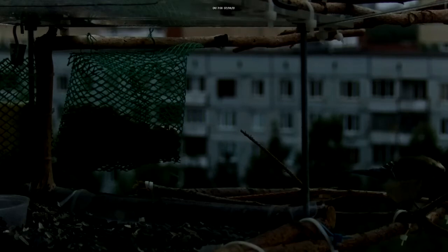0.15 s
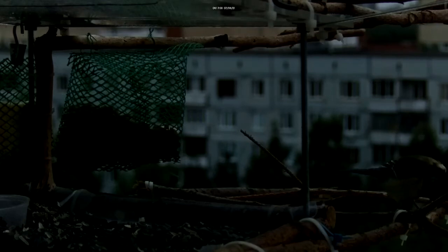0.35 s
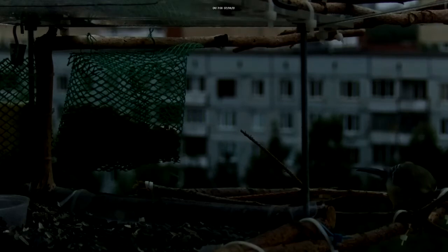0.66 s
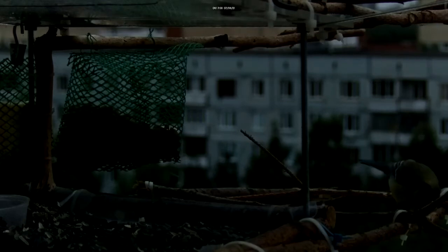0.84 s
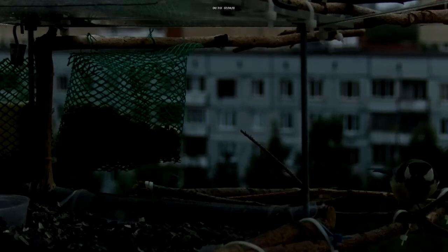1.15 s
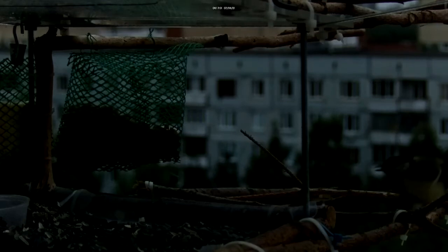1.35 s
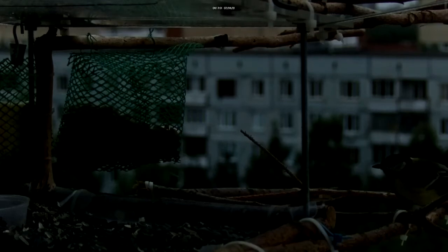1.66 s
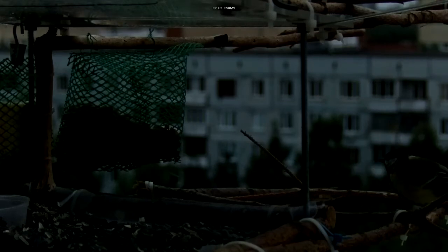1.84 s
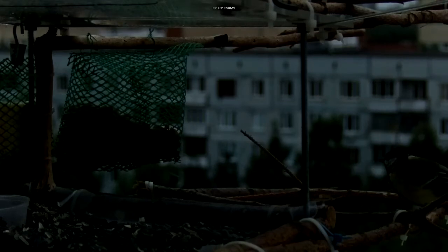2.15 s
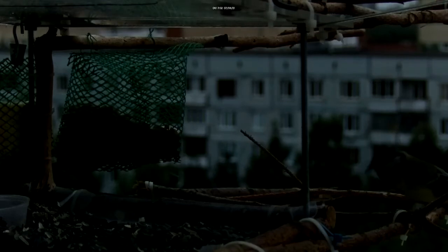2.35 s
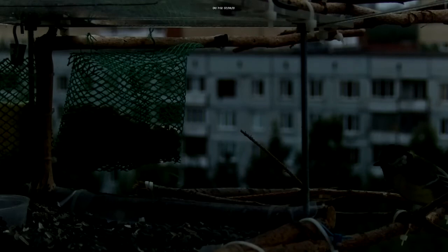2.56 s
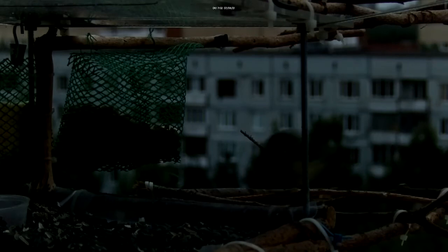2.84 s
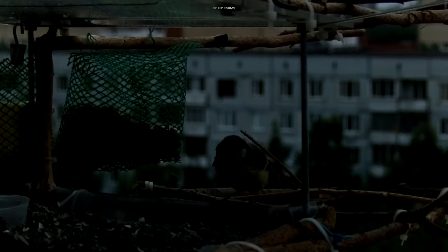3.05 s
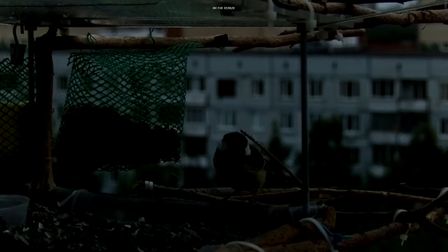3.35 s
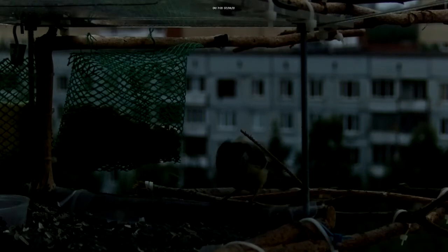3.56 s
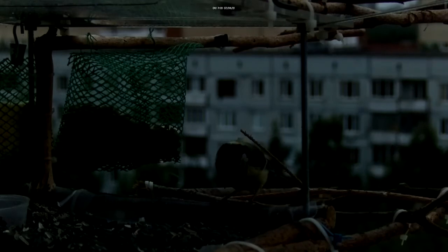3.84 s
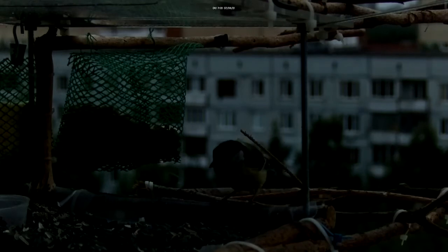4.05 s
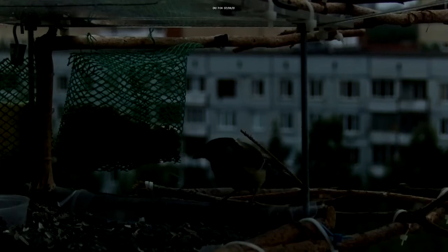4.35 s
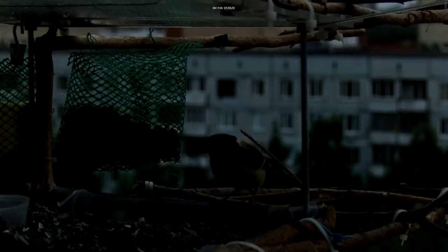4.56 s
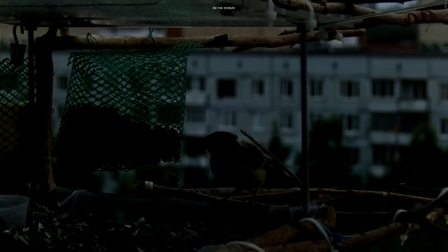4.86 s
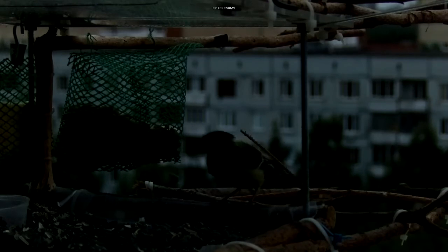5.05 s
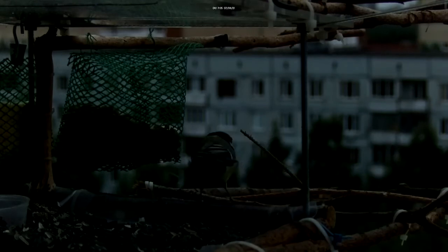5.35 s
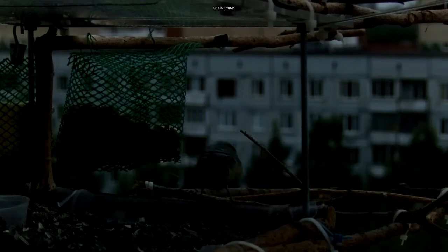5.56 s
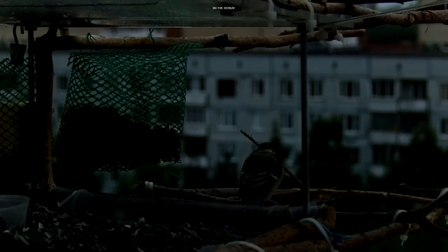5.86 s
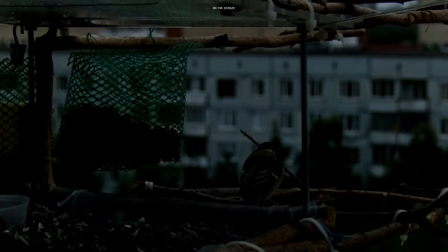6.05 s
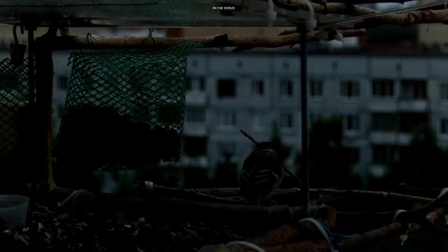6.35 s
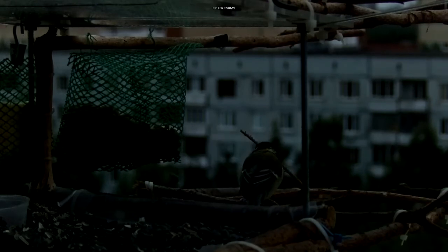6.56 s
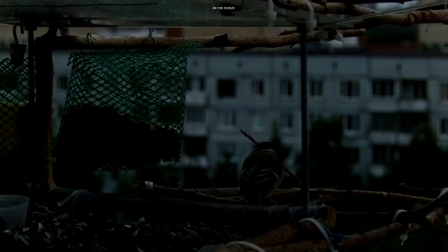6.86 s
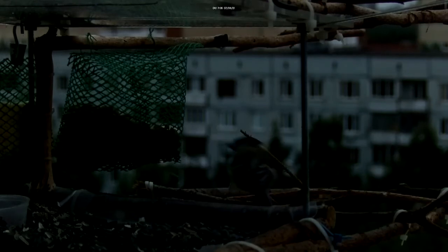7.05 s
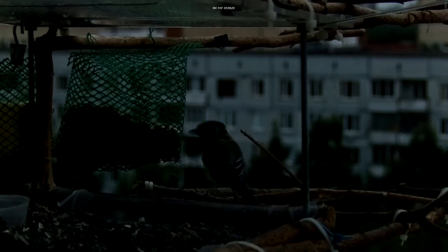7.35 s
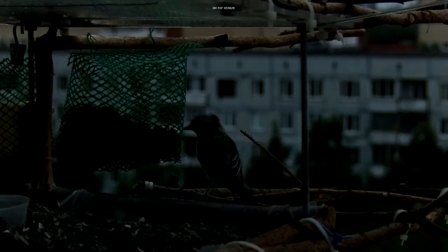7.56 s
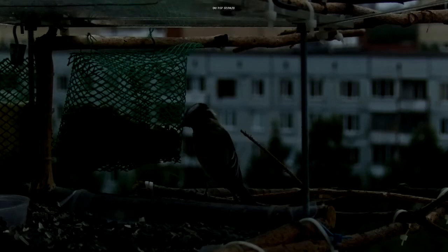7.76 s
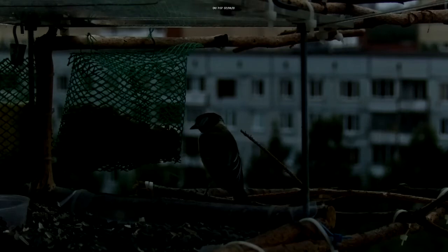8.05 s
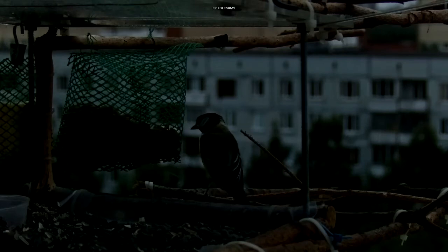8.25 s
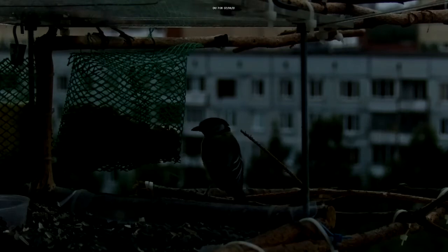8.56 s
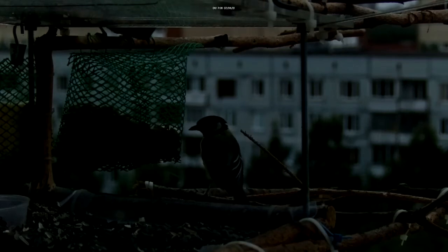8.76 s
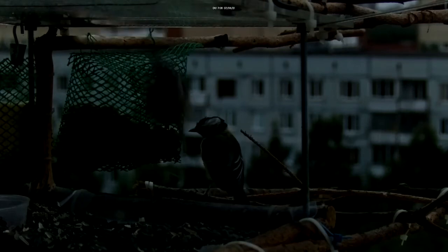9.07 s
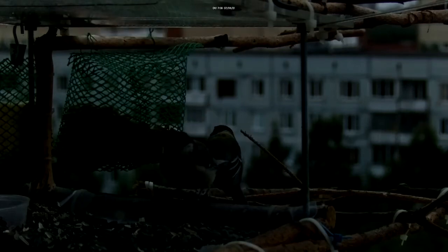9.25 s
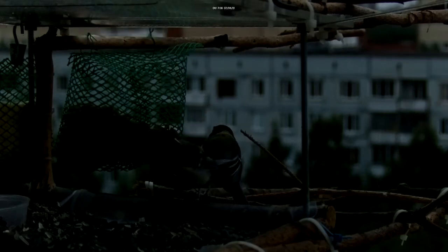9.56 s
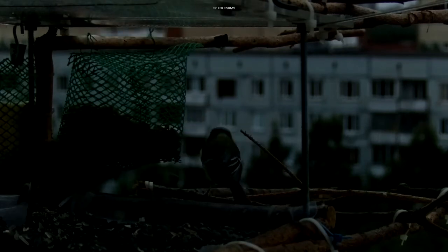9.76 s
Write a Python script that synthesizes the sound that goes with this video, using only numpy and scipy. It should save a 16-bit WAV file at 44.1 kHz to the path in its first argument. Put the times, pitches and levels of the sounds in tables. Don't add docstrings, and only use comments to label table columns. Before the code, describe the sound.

Small birds hop and peck at a wooden feeder, sharp taps, husk cracks and scratchy rustles over steady hiss, with brief chirps and a hoarse scold.

```python
import sys
import numpy as np
from scipy import signal
from scipy.fft import rfft, irfft, next_fast_len
from scipy.io import wavfile
from scipy.ndimage import uniform_filter1d

SR = 44100
rng = np.random.default_rng(int(sys.argv[2]) if len(sys.argv) > 2 else 0)


def gain_from_db(level_db):
    decades = np.asarray(level_db, float) / 20
    return 10 ** decades


def inscribe(sig):
    pcm = np.round(np.clip(np.atleast_2d(sig).T, -1, 1) * 32767)
    wavfile.write(sys.argv[1], SR, pcm.astype(np.int16))


N = 437031
t = np.arange(N) / SR

# f/Hz, level/dB
RUMBLE_EQ = [(15, -71), (25, -53), (119, -29.5), (202, -21), (238, -13.5), (413, -9.5), (630, -9),
             (785, -0.5), (1050, -1), (1460, -6), (2000, -20.5), (2600, -28), (4400, -120)]
# f/Hz, level/dB
YARD_EQ = [(2250, -4), (2700, -1.5), (3200, 0.5), (3700, 5.5), (4200, 3), (5200, 4), (6800, 0), (9000, -7)]
# f/Hz, level/dB
CIRCUIT_EQ = [(6000, -21.5), (9000, -10), (12000, -9.5), (15000, -9.5), (15800, -11.5)]
# t/s, level/dB
GAIN = [(0, -67.5), (1.1, -68.5), (1.78, -67), (1.99, -60), (2.005, -72), (2.04, -63.5), (2.15, -56),
        (2.45, -56.5), (2.75, -53.5), (4.3, -53), (9.91, -53.5)]
YARD_DB, CIRCUIT_DB, CIRCUIT_LAG_S = -4.5, -7.5, 0.098

# f/Hz, level/dB
FEATHERS_EQ = [(1350, -48), (2300, -7.5), (3550, -5.5), (3960, -2), (5110, -0.5), (7080, -3.5),
               (9000, -10.5), (11700, -58), (19800, -120)]
# t/s, length/s,
# level/dB
SHUFFLES = [(2.044, 0.016, -44), (2.111, 0.082, -49.5), (2.202, 0.035, -47), (2.231, 0.042, -45.5),
            (2.293, 0.057, -46), (2.331, 0.039, -55), (2.357, 0.035, -42.5), (2.631, 0.028, -52),
            (2.648, 0.035, -48), (2.665, 0.015, -34), (2.694, 0.02, -47), (2.8, 0.05, -50),
            (3.792, 0.022, -59), (4.206, 0.024, -52), (4.58, 0.15, -54.5), (4.645, 0.014, -56),
            (4.85, 0.045, -51), (4.88, 0.032, -43.5), (5.28, 0.027, -52.5), (5.98, 0.054, -56),
            (6.34, 0.027, -55), (7.455, 0.026, -46), (7.532, 0.059, -47.5), (7.987, 0.012, -42),
            (8.148, 0.015, -46), (8.731, 0.02, -49), (9.155, 0.012, -45.5)]
# t/s, length/s, level/dB
BRUSHES = [(.295, 0.047, -68.5), (.351, 0.072, -63.5), (1.296, 0.023, -67), (1.33, 0.062, -67),
           (1.776, 0.05, -61), (1.912, 0.022, -56), (3.832, .016, -40), (3.839, 0.089, -49.5),
           (4.088, 0.17, -53.5), (4.12, 0.0093, -54), (4.131, 0.014, -41), (4.749, 0.025, -49),
           (6.045, 0.088, -60), (6.878, .051, -55.5), (7.443, 0.014, -45), (7.731, 0.047, -48),
           (8.033, 0.019, -51), (8.07, 0.017, -42), (8.68, 0.048, -45), (8.697, 0.015, -45.5),
           (1.955, 0.025, -67)]
# t/s, length/s, level/dB
CRUMBS = [
    (9.127, 0.027, -47),
    (9.509, 0.009, -41.5),
    (9.72, 0.027, -48),
    (9.744, 0.0095, -44.5),
]
# t/s, length/s, level/dB
SCRAPES = [(1.792, 0.0075, -60.5), (2.68, 0.021, -36.5), (7.52, 0.011, -41), (8.688, 0.019, -48),
           (4.141, 0.028, -34.5), (4.181, 0.0043, -50), (4.19, 0.015, -49), (4.212, 0.0037, -48),
           (7.978, .009, -44), (8.047, 0.027, -33), (8.7965, 0.006, -30.5), (8.808, .006, -37)]
# events, centre f/Hz, treble level/dB, share of length spent fading/1
RUSTLE_TYPES = [
    (SHUFFLES, 5150, -21, 0.68),
    (BRUSHES, 5860, -15, 0.46),
    (CRUMBS, 5450, -1.2, 0.68),
    (SCRAPES, 5800, -11.5, 0.2),
]

# t/s, peak level/dB, ring f/Hz, scattered tail level/dB
KNOCKS = [(1.3159, -41.5, 6900, -18), (2.137, -33, 6500, -15), (2.2214, -26, 5200, -11),
          (2.2585, -28.5, 5200, -10), (2.3153, -22.5, 5260, -21), (2.3647, -20, 5960, -26),
          (2.37, -22, 6130, -28), (2.3843, -22.5, 6030, -12), (2.6658, -11, 5500, -14),
          (2.6757, -23, 4800, -6), (2.682, -19.5, 5340, -5.5), (3.8806, -25, 6040, -32),
          (3.9025, -34, 6500, -3), (4.2222, -28, 4400, -17), (4.559, -32.5, 5600, 0),
          (4.655, -35, 5600, -3), (4.7532, -16, 5700, -13.5), (6.0419, -24.5, 5470, -5.5),
          (6.0596, -35, 5540, -24), (6.8796, -40, 4010, -4), (8.001, -24, 7000, -5.5),
          (8.1395, -16.5, 3380, 1), (8.142, -21, 6500, -7), (7.469, -44, 6000, -13),
          (7.572, -48, 5500, -13), (8.71, -24, 5850, -1), (8.734, -29, 6000, 3.5)]
# t/s, peak level/dB, ring f/Hz, scattered tail level/dB
PECKS = [(1.3354, -41, 5300, -26), (1.3614, -36, 5960, -36), (1.7661, -49, 4010, -2),
         (1.8311, -34.5, 8300, -3), (1.916, -38.5, 3720, -11), (1.9933, -4, 5900, -15.5),
         (2.0364, -57, 5500, -16), (2.0473, -44, 4500, -10), (2.0933, -41, 3230, 1),
         (2.6903, -29, 5540, -5), (2.7154, -38, 5810, -12), (3.8109, -35, 6300, -20),
         (3.8878, -29, 6000, -13), (4.0832, -33, 6030, -19), (4.204, -20, 4400, -5),
         (4.7713, -33, 5470, 2.5), (4.8837, -34, 5990, -20), (6.0955, -35.5, 5600, -2.5),
         (7.5368, -40, 5100, 2), (7.556, -39, 7200, 2), (7.8124, -39, 5600, -2.5),
         (8.1378, -4.5, 5760, -14), (8.1619, -22, 4940, -29), (8.6781, -35, 5900, -15.5),
         (8.9633, -26, 7250, -11), (9.212, -33, 4630, -11), (9.64, -32, 7300, -6)]
# t/s, peak level/dB, ring f/Hz, scattered tail level/dB
CLAWS = [
    (4.1983, -22, 4650, -5),
    (7.4531, -38, 3740, 1),
    (8.716, -26, 4230, 2),
    (8.8335, -30, 9470, -4),
    (8.937, -28.5, 6600, 5),
    (9.136, -38, 4060, -9),
    (9.7577, -33, 6900, -21),
]
# t/s, peak level/dB, ring f/Hz, scattered tail level/dB
CRACKS = [
    (0.38, -42.5, 6100, 2),
    (0.4485, -44.5, 6300, -7),
    (7.748, -26.5, 5670, -12.5),
    (8.047, -23, 5550, -16),
    (9.5427, -34, 9900, -4.5),
    (9.5463, -21, 5850, -16),
    (9.5662, -18.5, 7160, -9),
    (9.5675, -34, 5600, -36),
    (9.8967, -29, 4800, -3.5),
]
# t/s, peak level/dB, ring f/Hz, scattered tail level/dB
SNAPS = [(4.2045, -33, 14500, -30), (4.528, -42, 8300, 6), (8.058, -24, 12600, -25),
         (8.7948, -36, 9000, -15), (8.7992, -8, 10600, -30), (8.8027, -9.5, 10900, -26),
         (8.8035, -15.5, 6040, -8), (9.2115, -37, 9600, -10), (9.5452, -16, 12600, -12),
         (9.8965, -24, 13000, -34), (9.9, -38, 12100, -12)]
# events, treble level/dB, tail T60/s, lowest twig mode level/dB, relative click width/1
TAP_TYPES = [
    (KNOCKS, -31, .022, -2, 0.23),
    (PECKS, -17, 0.021, -2.3, .29),
    (CLAWS, -10.5, 0.016, -12, .29),
    (CRACKS, 5.4, 0.013, -22, .25),
    (SNAPS, 0, 0.01, -27, 0.069),
]
# f/Hz, relative width/1, level/dB
TWIG = [(3500, 0.11, 9), (4400, 0.18, 10.5), (5600, 0.097, 1), (7140, 0.041, -23)]
FRAME_HZ = [3200, 4450, 5100, 5750, 6400, 7300]
FRAME_SCATTER_DB = 6.5
WALL_T60_S, WALL_DB = 0.097, -18.5

# t/s, peak level/dB, ring f/Hz, hollow boom above the ring/dB
THUMPS = [(0.383, -46.5, 1040, -10), (1.766, -46.5, 1110, -11), (1.917, -41, 1010, -11),
          (1.992, -40.5, 1190, -30), (2.145, -42.5, 1030, -26), (2.22, -44, 970, -21),
          (2.259, -38, 1110, -20), (2.304, -38, 1070, -29), (2.374, -33, 1110, -33),
          (2.666, -35.5, 1300, -18), (2.695, -32.5, 1250, -6.5), (3.838, -34.5, 1090, -15),
          (4.15, -40.5, 1300, -6.5), (4.202, -40, 1070, -6.5), (4.559, -31.5, 1280, -17.5),
          (4.761, -35, 1050, -12), (4.774, -38, 1060, -6.5), (6.039, -38.5, 1360, -18),
          (6.097, -40, 950, -6), (7.529, -44.5, 910, -7), (7.811, -41, 900, -27), (7.998, -40, 970, -9),
          (8.07, -41, 1310, -22), (8.136, -35, 1140, -6.5), (8.71, -37.5, 990, -4),
          (8.7945, -33.5, 1470, -17), (8.938, -37, 1200, -12)]
SEED_T60_S = 0.078

# t/s, length/s, start f/Hz, level/dB
CHIRPS = [(1.015, .022, 4100, -74), (4.448, .018, 4000, -60), (3.637, .019, 3950, -54),
          (3.722, .022, 4400, -48), (4.527, .02, 4100, -56), (5.0, .016, 3900, -55),
          (5.097, .027, 4250, -46), (5.214, .019, 4200, -43), (5.921, .022, 4100, -56),
          (6.159, .022, 4000, -50), (6.234, .028, 4280, -46), (6.425, .022, 4150, -50)]
# t/s, length/s, start f/Hz, level/dB
WHISTLES = [(1.986, 0.0068, 6400, -42), (2.125, 0.12, 550, -62), (2.27, 0.087, 560, -62),
            (2.36, 0.064, 552, -56), (2.792, 0.0044, 5760, -35), (2.844, 0.0046, 5740, -34),
            (2.8435, 0.0098, 4200, -43), (6.98, 0.22, 1570, -63), (7.078, 0.081, 4100, -61),
            (7.166, 0.067, 4020, -54), (7.23, .08, 4020, -67), (7.33, 0.08, 4010, -67),
            (7.4, 0.068, 4000, -55), (7.45, 0.25, 3930, -62), (7.55, 0.093, 3960, -58),
            (7.56, 0.19, 4140, -68), (7.77, 0.12, 4320, -57.5), (7.9, 0.091, 4360, -60),
            (8.355, 0.029, 2850, -60), (8.568, 0.015, 4100, -50)]
# t/s, length/s, start f/Hz, level/dB
WARBLES = [
    (4.792, .009, 4400, -46),
    (8.908, .016, 4170, -53),
    (6.64, .14, 6050, -65),
]
# t/s, length/s, start f/Hz, level/dB
TWITTER = [
    (7.484, 0.047, 5650, -56),
    (7.502, 0.013, 3500, -47),
    (8.416, 0.027, 3450, -56.5),
    (8.48, 0.036, 3500, -57),
    (8.552, 0.027, 3550, -56),
    (8.645, 0.028, 3750, -55),
    (9.0, 0.027, 3750, -57.5),
    (9.09, 0.042, 3900, -60),
]
# t/s, length/s, start f/Hz, level/dB
HUMS = [
    (6.22, 0.81, 367.6, -71),
    (6.25, 0.28, 298, -70),
    (6.85, 0.5, 301, -75),
]
# t/s, length/s, start f/Hz, level/dB
TRILL_DOWN = [
    (2.7985, 0.0071, 8730, -35.5),
    (2.8125, 0.0072, 7600, -32.5),
    (2.818, .005, 8400, -40),
    (2.8225, 0.0064, 7570, -28),
    (2.802, .007, 6100, -42),
    (2.818, .01, 6200, -44),
    (2.819, 0.014, 4900, -45),
    (2.823, 0.0086, 4260, -47),
]
# t/s, length/s, start f/Hz, level/dB
TRILL_UP = [
    (2.801, .014, 7500, -35),
    (2.832, 0.0048, 7100, -42),
    (2.838, 0.0079, 7000, -52),
    (2.798, .003, 6200, -40),
]
# events, end over start pitch/1, fall/(Hz/s), warble 0 to 1, softness of the ends/1
NOTE_TYPES = [
    (CHIRPS, 1, 62000, .3, .35),
    (WHISTLES, .997, 0, .35, .5),
    (WARBLES, .94, 0, .9, .2),
    (TWITTER, 1.05, 0, .8, .2),
    (HUMS, 1.005, 0, .05, .6),
    (TRILL_DOWN, .95, 0, .15, .4),
    (TRILL_UP, 1.11, 0, .15, .4),
]

# t/s, length/ms, level/dB, first
# mode f/Hz, second mode f/Hz
CREAKS = [(2.047, 16, -55, 4450, 6000), (2.092, 9, -55, 3200, 5600), (2.219, 8, -44, 5150, 4500),
          (2.257, 8, -44, 5100, 4500), (2.306, 20, -44, 5050, 3200), (2.343, 12, -49, 5200, 6000),
          (2.363, 14, -43, 6100, 4700), (2.674, 5, -36, 5800, 4500), (2.68, 8, -36, 5100, 6600),
          (2.689, 9, -41, 5100, 6000), (3.834, 12, -44, 4500, 6100), (3.862, 10, -53, 4500, 5900),
          (3.886, 10, -53, 3300, 6000), (4.145, 6, -40, 4500, 6300), (4.154, 8, -39, 4400, 6400),
          (4.163, 7, -46, 3200, 4700), (4.198, 4, -35, 4500, 5600), (4.2035, 4, -39, 4400, 3200),
          (4.212, 6, -48, 4400, 6300), (4.221, 5, -43, 4600, 3600), (4.858, 24, -49, 4700, 5900),
          (4.882, 12, -47, 5900, 7200), (4.902, 20, -44, 4600, 6100), (7.444, 8, -47, 4400, 5400),
          (7.45, 6, -48, 3400, 5200), (7.52, 4, -44, 6600, 4600), (7.524, 7, -43, 5700, 3700),
          (7.536, 6, -43, 4200, 5600), (7.979, 6, -43, 4280, 5750), (8.0005, 6, -42, 4300, 5500),
          (8.057, 9, -37, 5600, 6900), (8.065, 6, -39, 3500, 5400), (8.677, 4, -44, 5750, 7500),
          (8.708, 5, -40, 6300, 5700), (8.713, 6, -38, 4450, 3200), (8.726, 5, -37, 4700, 3200),
          (8.936, 5, -35, 7600, 5900), (9.5115, 5, -44, 4150, 8300), (9.5455, 3, -36, 5500, 8300),
          (9.566, 3.5, -34, 5400, 10400)]
CREAK_DB = 1

# t/s, length/s, level/dB, pitch f/Hz, beak resonance f/Hz
SCOLD = [
    (2.876, 0.058, -31.5, 521, 5950),
    (2.936, 0.062, -35, 515, 4960),
    (3.006, 0.057, -32.5, 516, 5370),
    (3.075, 0.053, -32.5, 565, 7800),
    (3.144, 0.059, -32.5, 490.7, 4540),
    (3.226, 0.066, -33, 565, 5160),
]
# f/Hz, level/dB
THROAT_EQ = [(1200, -22), (1740, -3), (2250, -10), (3200, -1), (3800, 1.5), (4550, -6), (5050, -14),
             (5600, -2.5), (6600, -8), (7900, -10), (8500, -4.5), (9700, -18.5), (11000, -21.5),
             (14000, -28)]
BEAK_DB, SCOLD_FADE_DB = -6, -6

# t/s, pitch f/Hz, level/dB
ENGINE = [
    (4.3, 195, -84),
    (4.8, 199.7, -76),
    (5.8, 210, -75.5),
    (6.8, 219, -80),
    (7.0, 223, -99),
]
ENGINE_PARTIALS_DB = [-6, -0.5]
# t/s, pitch f/Hz, level/dB
CRY = [
    (6.58, 1610, -70),
    (6.64, 1600, -60),
    (6.76, 1580, -59),
    (6.8, 1535, -63),
    (6.92, 1515, -64),
    (7.0, 1490, -63),
    (7.14, 1470, -71),
]
CRY_PARTIALS_DB = [-8, 0, -18, -14]

# f/Hz, level/dB
TYRES_EQ = [(1400, 6), (1800, -2), (3000, -3)]
CAR_S, CAR_SPAN_S, CAR_DB = 7.04, 0.22, -58


def unit(x):
    return x / np.sqrt(np.mean(x ** 2))


def peak(x):
    return x / np.abs(x).max()


def colour(x, points):
    hz, db = np.transpose(points)
    size = next_fast_len(len(x))
    octave = np.log2(np.arange(size // 2 + 1) * SR / size + 1)
    below = np.maximum(np.log2(hz[0]) - octave, 0)
    above = np.maximum(octave - np.log2(hz[-1]), 0)
    gain = gain_from_db(np.interp(octave, np.log2(hz), db) - 53 * (below + above))
    return unit(irfft(rfft(x, size) * gain, size)[:len(x)])


def walk(rate):
    hold = int(SR / rate)
    steps = np.repeat(rng.standard_normal(N // hold + 1), hold)
    return unit(uniform_filter1d(steps, hold)[:N])


def ring(x, hz, width):
    return signal.lfilter(*signal.iirpeak(hz, 1 / max(width, .02), fs=SR), x)


def frame(x, shares):
    return sum(gain_from_db(FRAME_SCATTER_DB * share) * ring(x, hz, 0.023) for hz, share in zip(FRAME_HZ, shares))


def add(out, s, sound):
    i = int(s * SR)
    out[i:i + len(sound)] += sound[:N - i]


def with_kind(types):
    return [row + tuple(kind) for table, *kind in types for row in table]


def ground():
    gain_db = np.interp(t, *np.transpose(GAIN))
    keep = np.exp(-1 / (CIRCUIT_LAG_S * SR))
    late_db = gain_db[0] + signal.lfilter([1 - keep], [1, -keep], gain_db - gain_db[0])
    circuit_db = np.minimum(gain_db, late_db) + CIRCUIT_DB
    layers = [(RUMBLE_EQ, gain_db, 1.05 * walk(9.9)),
              (YARD_EQ, gain_db + YARD_DB, 0.7 * walk(12)),
              (CIRCUIT_EQ, circuit_db, 0.41 * walk(19))]
    return sum(colour(rng.standard_normal(N), points) * gain_from_db(db + wander_db)
               for points, db, wander_db in layers)


def rustles():
    grains = rng.standard_normal(N) * gain_from_db(2.8 * walk(900) + 0.46 * walk(120))
    body = colour(grains, FEATHERS_EQ)
    treble = colour(grains, [(8500, -5.0), (10500, -9.0), (13000, -7.5), (15500, -10.0)])
    out = np.zeros(N)
    rows = with_kind(RUSTLE_TYPES)
    spots = rng.standard_normal((len(rows), len(FRAME_HZ)))
    for (s, length, db, hz, treble_db, fade), shares in zip(rows, spots):
        part = slice(int(s * SR), int((s + length) * SR))
        rub = ring(body[part], hz, 1.0) + 0.67 * frame(body[part], shares)
        sound = unit(rub) + gain_from_db(treble_db) * treble[part]
        add(out, s, gain_from_db(db) * sound * signal.windows.tukey(len(sound), min(fade, 1)))
    return out


def taps():
    out = np.zeros(N)
    fall = np.log(1000) * t[:SR // 8]
    blow = (fall == 0) * 1.
    edge = peak(ring(ring(blow, 9900, 0.86), 9900, 0.86))
    perch = peak(ring(blow, 3630, 0.12))
    rows = with_kind(TAP_TYPES)
    noises = rng.standard_normal((len(rows), len(fall)))
    spots = rng.standard_normal((len(rows), len(FRAME_HZ)))
    for row, noise, shares in zip(rows, noises, spots):
        s, db, hz, tail_db, treble_db, t60, perch_db, click_width = row
        click = peak(ring(ring(blow, hz, click_width), hz, 0.44))
        twig = sum(gain_from_db(mode_db) * ring(ring(noise, mode_hz, width), mode_hz, 2 * width)
                   for mode_hz, width, mode_db in TWIG)
        scatter = unit(twig) + 0.83 * unit(frame(noise, shares))
        scatter += 0.28 * unit(ring(ring(noise, hz, 0.2), hz, 0.76))
        scatter += gain_from_db(treble_db) * unit(ring(noise, 6200, 0.83))
        decay = np.exp(-fall / t60) + gain_from_db(WALL_DB) * np.exp(-fall / WALL_T60_S)
        tail = scatter * decay + gain_from_db(perch_db) * perch
        add(out, s, gain_from_db(db) * (click + gain_from_db(treble_db) * edge + gain_from_db(tail_db - 7.5) * tail))
    return out


def thumps():
    out, u = np.zeros(N), t[:SR // 6]
    noises = rng.standard_normal((len(THUMPS), len(u)))
    for (s, db, hz, boom_db), noise in zip(THUMPS, noises):
        blow = gain_from_db(-16.5) * noise * np.exp(-np.log(1000) * u / SEED_T60_S)
        blow[0] = 1
        board = ring(ring(blow, hz, 0.22), hz, 1.0)
        hollow = ring(ring(blow, 540, 0.26), 430, 0.87)
        add(out, s, gain_from_db(db) * (peak(board) + gain_from_db(boom_db + 3.5) * peak(hollow)))
    return out


def notes():
    out, warble = np.zeros(N), walk(700)
    for s, length, hz, db, glide, fall, rough, soft in with_kind(NOTE_TYPES):
        count = int(length * SR)
        pitch = np.linspace(hz, hz * glide - fall * length, count)
        tone = np.sin(2 * np.pi * np.cumsum(pitch) / SR)
        wobble = 1 - rough * 0.19 + rough * warble[int(s * SR):][:count]
        add(out, s, np.sqrt(2) * gain_from_db(db) * np.hanning(count) ** soft * wobble * tone)
    yard = rng.standard_normal(SR // 5) * np.exp(-t[:SR // 5] / 0.01)
    return out + gain_from_db(-11.0) * signal.fftconvolve(out, yard / np.linalg.norm(yard))[:N]


def creaks():
    out = np.zeros(N)
    noises = rng.standard_normal((len(CREAKS), SR // 20))
    for (s, ms, db, *pair), noise in zip(CREAKS, noises):
        count = int(ms * SR / 1000)
        push = noise * np.pad(np.sqrt(np.hanning(count)), (0, len(noise) - count))
        sound = sum(unit(ring(ring(push, hz, 0.08), hz, 0.2)) for hz in pair)
        add(out, s, gain_from_db(db + CREAK_DB) * unit(sound) * np.sqrt(count / len(noise)))
    return out


def scold():
    s, hz = np.transpose(SCOLD)[[0, 3]]
    phase = 2 * np.pi * np.cumsum(np.interp(t, s, hz) * (1 + 0.033 * walk(120))) / SR
    voice = np.zeros(N)
    for k in range(2, 28):
        swell = gain_from_db(1.0 * walk(45))
        flutter = walk(650) + 1.5 * (k % 3 == 0)
        voice += swell * flutter * np.sin(k * phase)
    throb = 1 + 0.16 * np.sin(2 * np.pi * np.cumsum(280 * (1 + 0.139 * walk(120))) / SR)
    voice = colour(voice * throb * gain_from_db(0.5 * walk(320)), THROAT_EQ)
    out = np.zeros(N)
    for s, length, db, _, beak_hz in SCOLD:
        note = voice[int(s * SR):int((s + length) * SR)]
        note = unit(note) + gain_from_db(BEAK_DB) * unit(ring(note, beak_hz, 0.08))
        shape = signal.windows.tukey(len(note), .55) * gain_from_db(np.linspace(0, SCOLD_FADE_DB, len(note)))
        add(out, s, gain_from_db(db) * shape * unit(note))
    return out + gain_from_db(-10.0) * np.roll(out, int(0.006 * SR))


def drone(curve, partials_db, flutter_hz, steady):
    s, hz, db = np.transpose(curve)
    phase = 2 * np.pi * np.cumsum(np.interp(t, s, hz)) / SR
    voice = sum(gain_from_db(part_db) * (steady + walk(flutter_hz)) * np.sin((k + 1) * phase)
                for k, part_db in enumerate(partials_db))
    return voice * gain_from_db(np.interp(t, s, db, left=-200, right=-200))


def engine():
    return drone(ENGINE, ENGINE_PARTIALS_DB, flutter_hz=7.9, steady=1.74)


def cry():
    return drone(CRY, CRY_PARTIALS_DB, flutter_hz=170, steady=0.35)


def car():
    return colour(rng.standard_normal(N), TYRES_EQ) * gain_from_db(CAR_DB) / (1 + ((t - CAR_S) / CAR_SPAN_S) ** 2)


def scene():
    feeder = ground() + rustles() + taps() + thumps()
    return (feeder + notes() + creaks() + scold() + engine() + cry() + car())[None]


def roll_off(x):
    return signal.sosfilt(signal.butter(12, 17000, fs=SR, output="sos"), x)


def record(dry):
    x = 0.22 * dry + 0.72 * signal.lfilter(*signal.iirnotch(2090, 3.5, fs=SR), dry)
    x = signal.sosfilt(signal.ellip(8, .2, 40, 15800, fs=SR, output="sos"), x)
    over = np.maximum(np.abs(x) - gain_from_db(-12.5), 0)
    held = signal.lfilter([1], [1, -np.exp(-1 / (0.031 * SR))], over)
    late = np.roll(held, int(0.0029 * SR))
    x = x / (1 + 1.03 * late)
    return roll_off(x)


dry = scene()
out = record(dry)
inscribe(out)
```